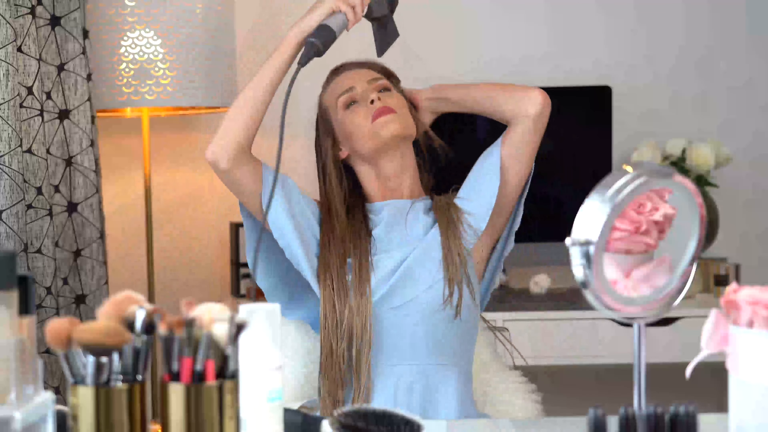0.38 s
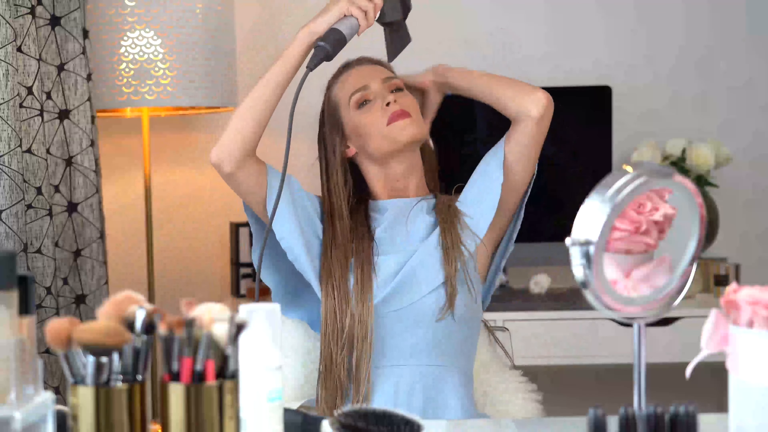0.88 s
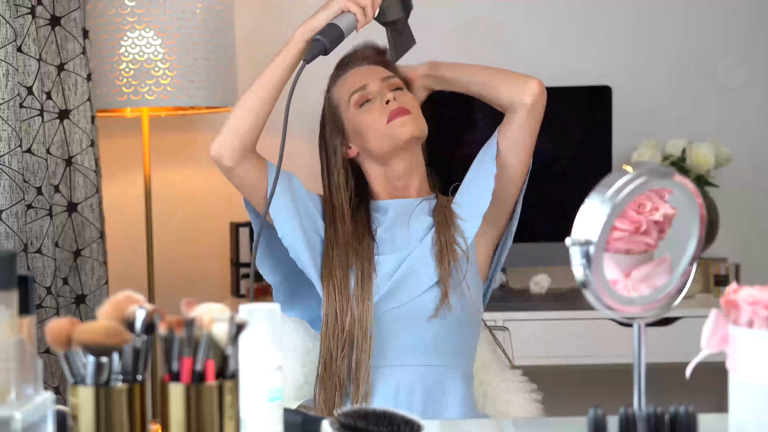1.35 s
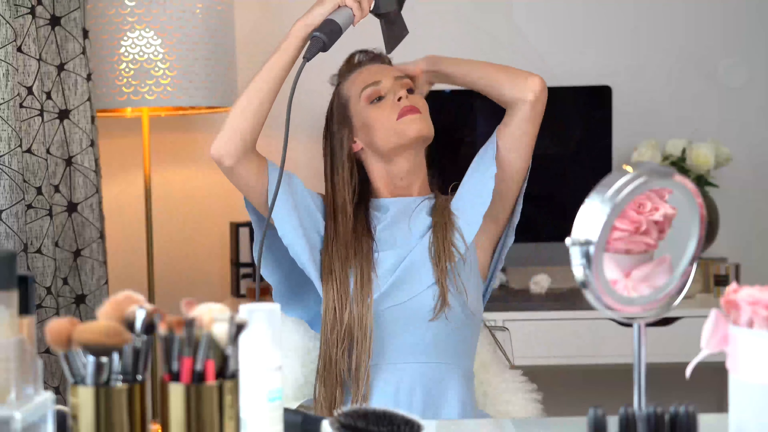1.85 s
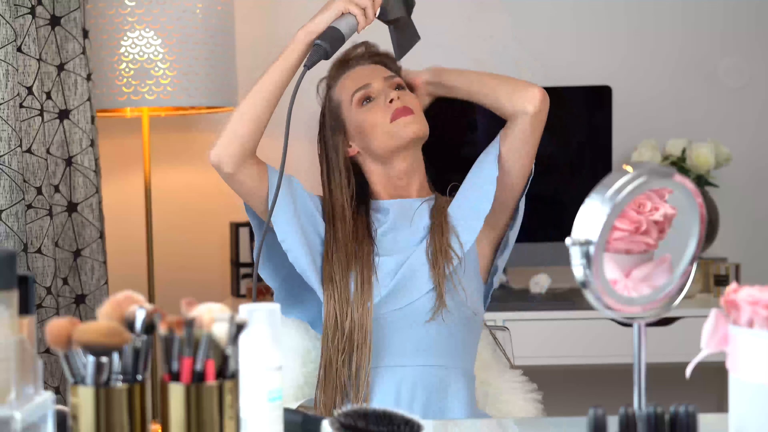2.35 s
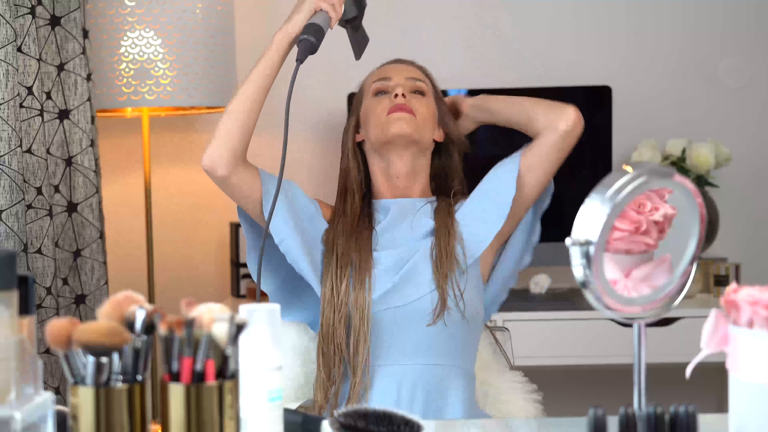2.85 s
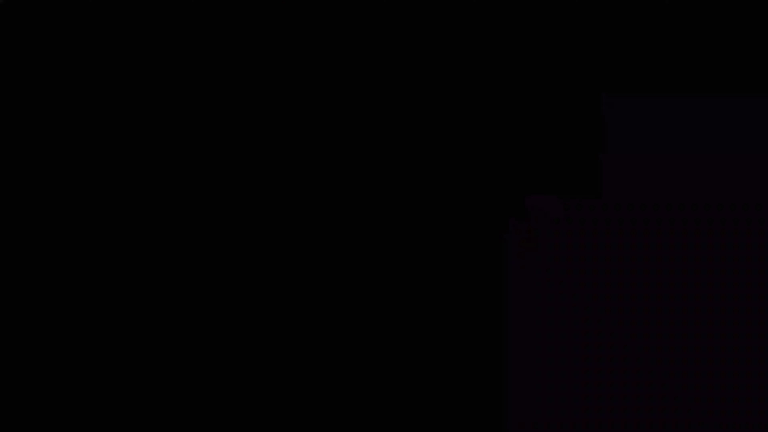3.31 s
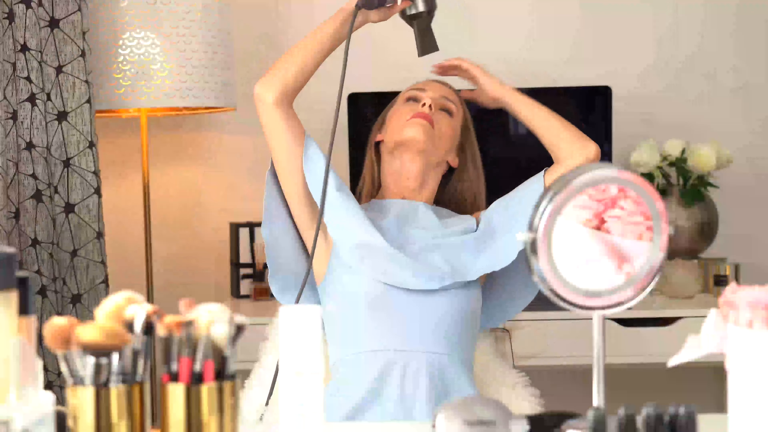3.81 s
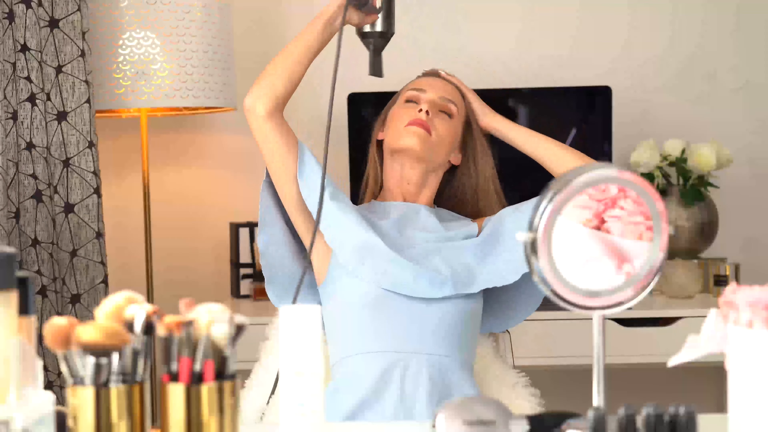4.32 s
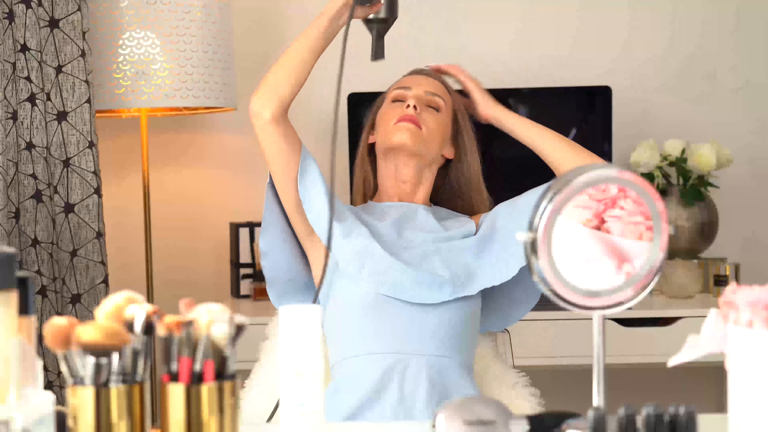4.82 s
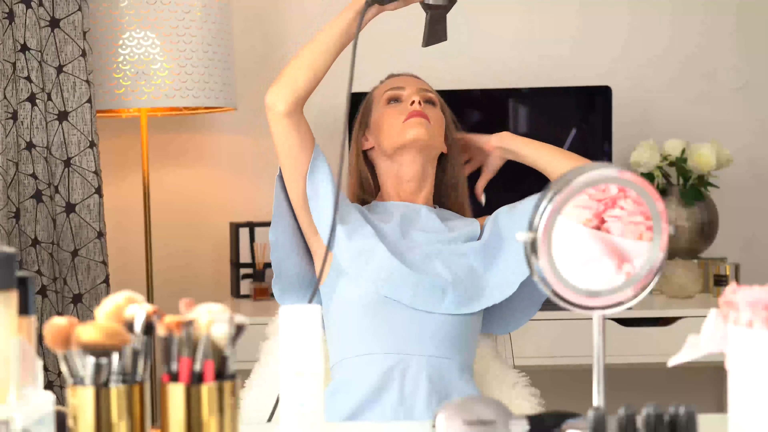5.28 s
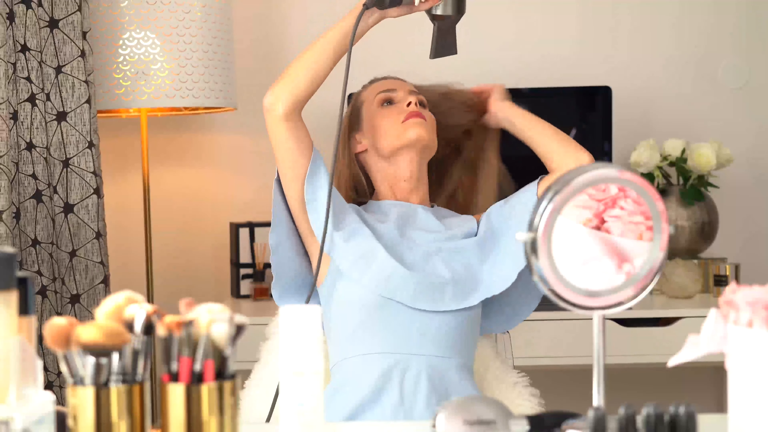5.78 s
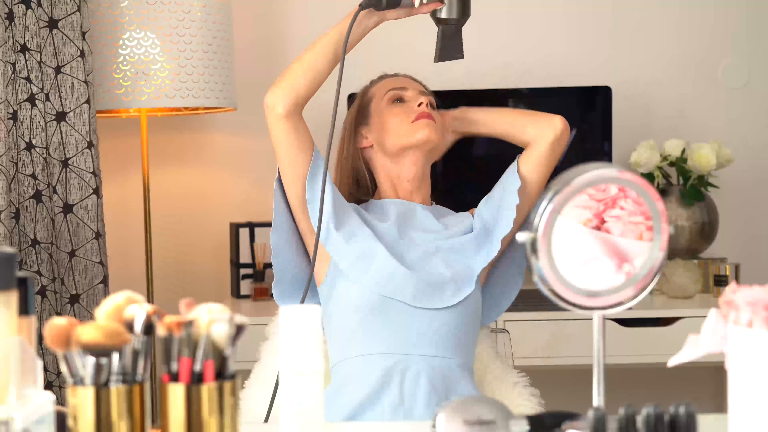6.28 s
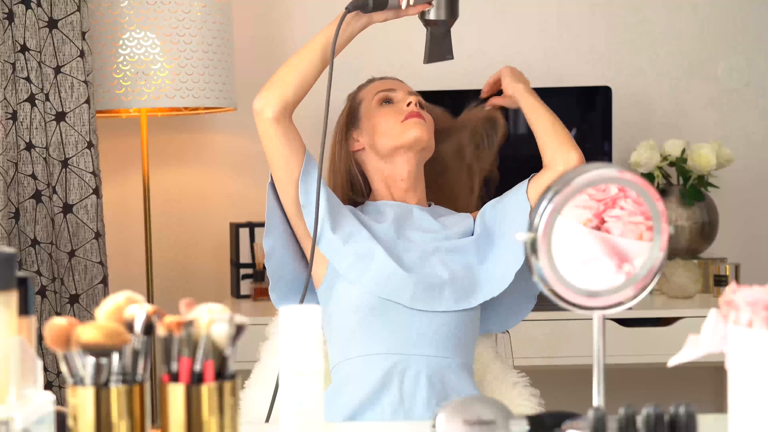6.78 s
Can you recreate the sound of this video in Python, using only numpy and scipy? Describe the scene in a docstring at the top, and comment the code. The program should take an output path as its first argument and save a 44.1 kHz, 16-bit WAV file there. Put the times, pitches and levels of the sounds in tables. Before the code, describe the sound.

A hair dryer blows steadily close by, first sped-up and thin with an octave-higher whine, then after a tiny gap at normal, fuller pitch.

```python
"""Hair dryer, close room

A hand-held dryer blows on wet hair in a furnished room, two metres from a stereo microphone pair.
Two passages with a short silence between: the first at double speed, every pitch an octave up.
The air is noise shaped by room and housing; hand and lifted hair sweep through the jet. A seven-blade
fan, made of wavering sines, sings faintly through it, over a low microphone rumble."""
import sys
import numpy as np
from scipy import signal
from scipy.io import wavfile
from scipy.ndimage import uniform_filter1d, map_coordinates

SR = 44100
rng = np.random.default_rng(int(sys.argv[2]) if len(sys.argv) > 2 else 0)


def generate_wav(sig):
    """Save sig (samples, or channels by samples) to the path in sys.argv[1] as 16-bit PCM at SR."""
    pcm = np.round(np.clip(np.atleast_2d(sig).T, -1, 1) * 32767).astype(np.int16)
    wavfile.write(sys.argv[1], SR, pcm)


def volts_from_decibels(level):
    """Turn decibel levels (scalar or array-like) into linear amplitude factors."""
    exponent = np.asarray(level, float) / 20
    return 10 ** exponent


N = 304321  # samples

# Relative spectrum of the rush at normal speed: f/Hz, density/dB per Hz
AIR_SPECTRUM = [(20, -52), (60, -43.5), (110, -33.5), (170, -28.5), (260, -18), (350, -13.5), (600, -9.5),
                (1200, -3.5), (2200, -2), (4500, -2), (7600, -2.5), (10000, -4.5), (13600, -14),
                (15700, -9.5)]
# Crossovers from rumble to wash, roar and hiss, at normal speed: f/Hz
LAYER_SPLITS = [400, 1400, 6000]
# Ringing nozzle, which also dulls the top: f/Hz, width/Hz, share of the resonance level (of 1)
NOZZLE_RINGS = [(3960, 300, .6), (5120, 300, 1.3), (13000, 5000, -.5)]
# Likeness of the two ports at normal speed: f/Hz, correlation (0-1)
PORT_LIKENESS = [(40, 0.9), (100, 1), (350, 0.97), (700, 0.88), (1100, 0.79), (1900, 0.59), (2900, 0.34),
                 (4000, 0.37), (6000, 0.43), (15000, 0.44)]
# Balance of the ports at normal speed: f/Hz, left minus right/dB
PORT_LEAN = [(300, 0), (700, -0.1), (2400, -0.9), (4400, 0.5), (8000, -4.5), (15000, 2)]
# Standing waves of room and housing at normal speed: f/Hz
MODE_HZ = [88, 131, 188, 222, 295, 350, 400, 448, 560, 680, 812, 903, 1097, 1325, 1523, 1600, 1730, 2175,
           2290, 3150, 3350, 3965, 4040, 5180, 5730, 7040]
# For each of them: width/Hz, peak in the fast passage/dB, peak in the normal one/dB
MODE_SHAPE = [(10, 7.5, 8), (25, 8.5, 9), (20, 9, 7), (15, 4, 4), (14, 2, 10.5), (30, 4, 7.5), (40, 6.5, 1),
              (25, 1, 4.5), (20, 0, 7), (30, 2.5, 3.5), (30.2, 6.5, 7), (20, 4, 3.5), (35, -1.5, 1),
              (55, 1.5, 4.5), (45, 0, 4), (90, 3, 1.5), (90, 3.5, 4), (110, 1.5, 6), (151, 4.5, .5),
              (200, 1, 3.5), (150, 1, 3), (130, 6, -0.5), (150, -2, 2.5), (250, -0.5, 2), (120, 3, 0.5),
              (150, -3, 3)]
# Steady levels with the jet aimed at the head: rumble, wash, roar, hiss level/dB
FAST_LEVELS = (-52, -37, -27, -33)
NORMAL_LEVELS = (-52.5, -38, -27, -28.5)
# Hand and lifted hair in the jet: middle t/s, width at half the swell/s, rumble swell/dB, wash swell/dB
SWEEPS = [(.36, .14, 2, 0.5), (.76, .1, 1, 2.5), (1.0, 0.18, 3.5, 2), (1.438, .2, 4.5, 3.5),
          (1.914, .18, 3.5, 3.5), (2.294, 0.12, 2, 2.5), (2.42, 0.19, 5, 2), (2.68, .14, 0, 2),
          (2.94, 0.21, -1, 3.5), (3.468, 0.11, 6, 1.5), (3.69, .14, 2.5, 1), (3.937, .08, -2, 7),
          (4.62, 0.2, 2.5, 1), (5.144, 0.17, 5, 7.5), (5.55, 0.16, 5.5, .5), (5.86, 0.27, 7.5, 0.5),
          (6.383, 0.32, 7.5, 2), (6.65, 0.2, 4.5, 1.5)]
# Where the nozzle points: t/s, jet on the head/dB before AIM_SHARES, treble/dB,
# nozzle resonance/dB before its shares
AIM = [(0, -3, 0, 2.5), (.22, -2.5, 1, 3.5), (.27, 0, 1, 2.5), (.8, 0.5, -.5, .5), (1.12, -.5, 2, 1.5),
       (1.5, 0, 0, 1.5), (2.6, .5, .5, 2), (3.0, -.5, -1.5, 1), (3.15, -2, 2.5, 3), (3.38, -1, 2.5, 4.5),
       (3.41, .5, .5, 0.5), (3.95, .5, -1, 2), (4.25, -.5, 0, 5), (4.9, 0, 0.5, 5), (5.15, -.5, -0.5, 0),
       (5.5, -.5, 0, 2), (6.3, 0, 0, 0), (6.9, 0.5, 0, 1)]
# How far rumble, wash and roar follow the jet: dB per dB
AIM_SHARES = (1.5, 0.79, 0.44)
# The bass comes in lumps with gaps: f/Hz, extra drift depth/dB
BASS_LUMPS = [(60, 4.5), (150, 3), (400, 0.5)]
# Fan speed, as the pitch of the fourth blade multiple: t/s, f/Hz
FAST_PITCH = [(0, 15672), (.6, 15660), (1.7, 15650), (1.9, 15592), (2.3, 15600), (2.45, 15584),
              (2.9, 15588), (3.1, 15562), (3.35, 15580)]
NORMAL_PITCH = [(3.42, 7816), (3.75, 7808), (4.4, 7817), (4.9, 7808), (5.6, 7807), (6.9, 7811)]
# Fan tones among the wall echoes, before flutter: t/s, fourth blade multiple level/dB, blade tone level/dB
FAN_LEVELS = [(0, -44, -40), (.4, -39, -45), (1.2, -40, -41), (1.6, -38, -43), (1.85, -50, -41.5),
              (2.3, -36, -48), (2.55, -43, -58), (2.8, -37, -45), (3.05, -44, -37), (3.38, -48, -49),
              (3.41, -45, -37), (3.76, -37, -37), (3.9, -50, -40.5), (4.45, -36, -42.5), (4.85, -48, -46),
              (5.05, -41, -54), (5.5, -46, -41.5), (6.1, -33.5, -44), (6.4, -44, -47), (6.9, -37, -43)]
# End of the fast passage: t/s, gain/dB
FADE = [(3.357, 0), (3.366, -24), (3.374, -23), (3.382, -52), (3.396, -60), (3.399, -100)]

RESUME_S = 3.4162  # the normal-speed passage cuts in
TOP_HZ = 15720  # the steady air stops here in both passages
SHORT, LONG = 1024, 8192  # analysis frames in samples
ROAR_SHARE = 0.071  # the roar swells by this share of the wash swell, dB per dB


def air(steady_db, speed, drift_db, ripple_db, twist):
    """Turbulent jet: four layers follow the nozzle's aim; broad patches drift as the dryer moves."""
    steady = room(speed, ripple_db, twist)

    def gain(hz, t, z):
        true_hz = hz / speed
        layer_db, nozzle_db = layers(steady_db, t)
        # share of each layer in each bin, from differences of soft low-pass edges
        edges = [1 / (1 + (true_hz / split) ** 6) for split in LAYER_SPLITS]
        below = np.array([0 * true_hz] + edges + [1 + 0 * true_hz])
        shares = np.diff(below, axis=0)
        # mid power of each layer before levelling
        power = np.mean(np.abs(z.mean(0)) ** 2, axis=1)
        part = shares @ power / power.sum() * np.mean(steady.mean(0) ** 2)
        level_power = sum(np.outer(share / p, volts_from_decibels(db) ** 2)
                          for share, p, db in zip(shares, part, layer_db))
        ring = sum(share * bell(true_hz, centre, width) for centre, width, share in NOZZLE_RINGS)
        depth_db = drift_db + along(BASS_LUMPS + [(800, 0)], hz)
        field = patches(z.shape[1:], bins=4 * speed, frames=40 // speed)
        drift = unit(volts_from_decibels(depth_db[:, None] * field))
        return z * np.sqrt(level_power) * volts_from_decibels(np.outer(ring, nozzle_db)) * drift
    return reshaped(steady, SHORT, gain)


def layers(steady_db, t):
    """Rumble, wash, roar and hiss levels from aim and sweeps, and the level of the nozzle resonance."""
    jet_db, treble_db, nozzle_db = curves(AIM, t)
    middle, width, *swell_db = np.transpose(SWEEPS)
    place = np.clip((t - middle[:, None]) / width[:, None], -1, 1)
    rumble_db, wash_db = swell_db @ np.cos(np.pi * place / 2) ** 2
    swells_db = [rumble_db, wash_db, ROAR_SHARE * wash_db]
    moving_db = np.outer(AIM_SHARES, jet_db) + swells_db
    return np.array(steady_db)[:, None] + [*moving_db, treble_db], nozzle_db


def room(speed, ripple_db, twist):
    """Steady turbulence at the two ports, through standing waves and shifting wall interference."""
    def gain(hz, t, z):
        true_hz = hz / speed
        modes_db = sum((normal_db, fast_db)[speed - 1] * bell(true_hz, centre, width)
                       for centre, (width, fast_db, normal_db) in zip(MODE_HZ, MODE_SHAPE))
        colour = volts_from_decibels(along(AIR_SPECTRUM, true_hz) + modes_db) * (hz < TOP_HZ)
        # mid and side shares that give the wanted correlation
        alike = np.clip(along(PORT_LIKENESS, true_hz), 0, 1)[:, None]
        half_angle = np.arccos(alike) / 2
        mid, side = z[0] * np.cos(half_angle), z[1] * np.sin(half_angle)
        # narrow, lasting ripples: shared and shallower where the ports are alike
        one, other = patches(z.shape, bins=3 * speed, frames=8 // speed)
        fields = np.array([one, alike * one + np.sqrt(1 - alike ** 2) * other])
        ripple = unit(volts_from_decibels(ripple_db * (1 - 0.58 * alike ** 2) * fields))
        # path lengths differ: phases in radians shift apart where the ports are unlike
        phase = patches(z.shape, bins=20 * speed, frames=8 // speed)
        skew = np.exp(1j * twist * (1 - alike) * phase)
        lean = volts_from_decibels(np.outer([.5, -.5], along(PORT_LEAN, true_hz)))
        return np.array([mid + side, mid - side]) * ripple * skew * (colour * lean)[:, :, None]
    return reshaped(rng.standard_normal((2, N)), LONG, gain)


def fan(pitch, speed, eighth_db, shaft_db, lead, flutter_db):
    """Twice the shaft speed and blade tone x1, x4, x8; wall echoes make each waver at each port."""
    t = np.arange(N) / SR
    fourth_db, blade_db = curves(FAN_LEVELS, t)
    turns = np.cumsum(curves(pitch, t)[0] / 28) / SR  # seven blades, fourth multiple
    tones = np.zeros((2, N))
    levels_db = (shaft_db, blade_db, fourth_db, fourth_db + eighth_db)
    for order, db in zip((2, 7, 28, 56), levels_db):
        waver = np.array([wobble(8 * speed), wobble(8 * speed)])
        slip = 0.48 * np.array([wobble(4 * speed), wobble(4 * speed)])  # rad
        left_lead = [[lead * (order > 2)], [0]]  # rad, blade tones only
        wave = np.sin(2 * np.pi * order * turns + left_lead + slip)
        tones += np.sqrt(2) * volts_from_decibels(db + flutter_db * waver) * wave
    return tones


def floor():
    """Flickering low rumble of the microphone: lumps of 20-110 Hz noise, mostly alike at both ports."""
    band = signal.butter(2, [20, 110], "band", fs=SR, output="sos")
    low = signal.sosfilt(band, rng.standard_normal((2, N)))
    ports = low[0] + [[.45], [-.45]] * low[1]
    return volts_from_decibels(-86.5) * unit(ports * volts_from_decibels(8 * wobble(7)))


def reshaped(x, size, gain):
    """Resynthesis of x from the time-frequency cells that gain(hz, t, cells) returns."""
    hz, t, z = signal.stft(x, SR, nperseg=size, noverlap=size * 3 // 4)
    return signal.istft(gain(hz, t, z), SR, nperseg=size, noverlap=size * 3 // 4)[1][:, :N]


def patches(shape, bins, frames):
    """Random field of rms 1, smoothed over so many bins and frames."""
    field = rng.standard_normal(shape)
    for _ in range(2):
        field = uniform_filter1d(field, bins, -2)
        field = uniform_filter1d(field, frames, -1)
    return unit(field)


def wobble(rate):
    """A smooth random curve, rate knots a second."""
    knots = rng.standard_normal(int(N / SR * rate) + 4)
    return map_coordinates(knots, [np.arange(N) * rate / SR])


def bell(hz, centre, width):
    """Power shape of one resonance, 1 at its centre."""
    return 1 / (1 + (2 * (hz - centre) / width) ** 2)


def along(points, hz):
    """(f/Hz, value) points read on a log frequency axis."""
    f, value = np.transpose(points)
    return np.interp(np.log(hz + 1), np.log(f + 1), value)


def curves(rows, t):
    """Each column after the time, read at times t."""
    times, *columns = np.transpose(rows)
    return [np.interp(t, times, column) for column in columns]


def unit(x):
    """Scaled to rms 1."""
    return x / np.sqrt(np.mean(np.abs(x) ** 2) + 1e-20)


def scene():
    """The fast passage fades out; after a short silence the normal one cuts in."""
    t = np.arange(N) / SR
    fast = air(FAST_LEVELS, 2, drift_db=0.2, ripple_db=3.0, twist=1.32)
    fast = fast + fan(FAST_PITCH, 2, eighth_db=-88, shaft_db=-60, lead=1.0, flutter_db=-1.0)
    normal = air(NORMAL_LEVELS, 1, drift_db=0.67, ripple_db=3.5, twist=1.12)
    normal = normal + fan(NORMAL_PITCH, 1, eighth_db=-18, shaft_db=-63.5, lead=0.52, flutter_db=0.5)
    low = floor()
    return (fast + low) * volts_from_decibels(curves(FADE, t)[0]) + (normal + low) * (t >= RESUME_S)


def roll_off(x):
    """The treble ends steeply here."""
    return signal.sosfilt(signal.butter(12, 17040, fs=SR, output="sos"), x)


def record(dry):
    """The finished stereo mix as delivered."""
    return roll_off(dry)


dry = scene()
out = record(dry)
generate_wav(out)
```